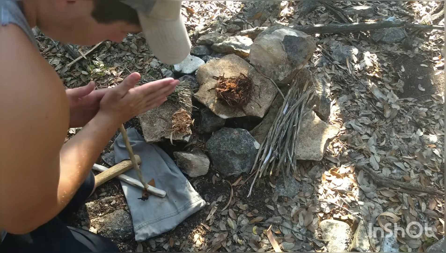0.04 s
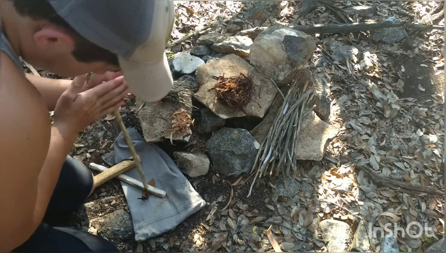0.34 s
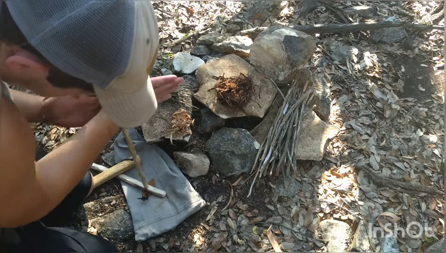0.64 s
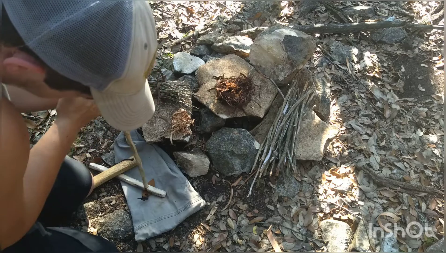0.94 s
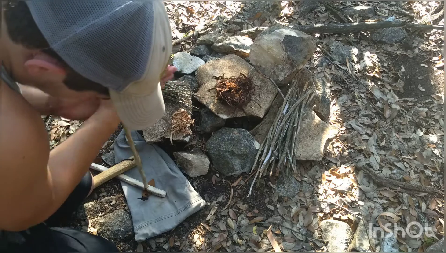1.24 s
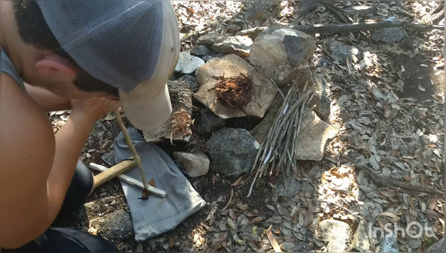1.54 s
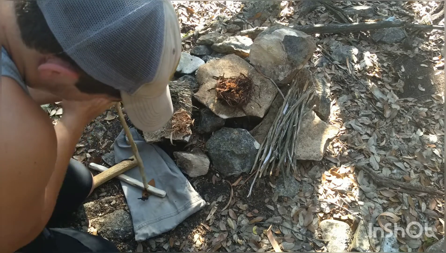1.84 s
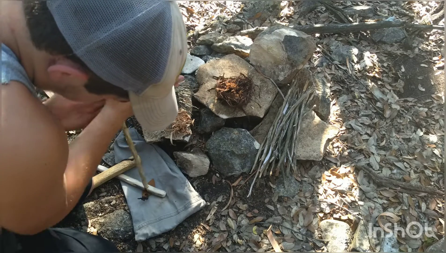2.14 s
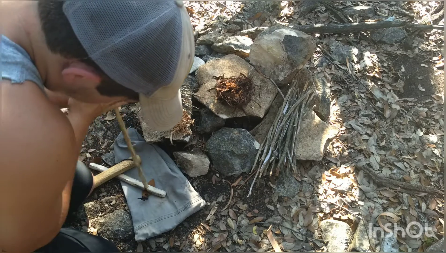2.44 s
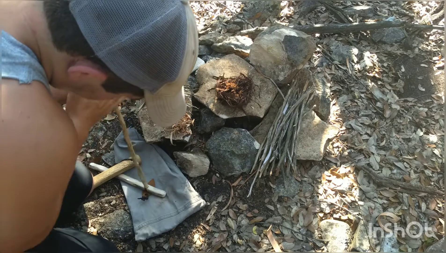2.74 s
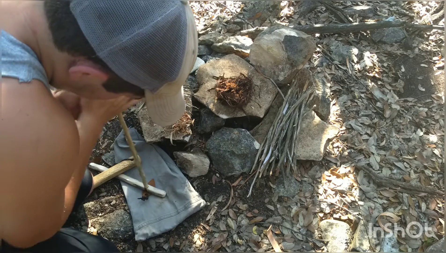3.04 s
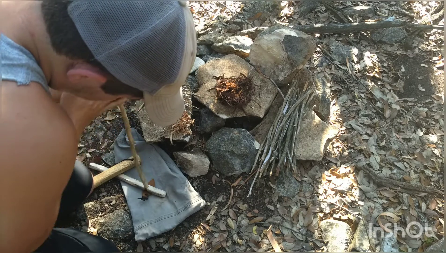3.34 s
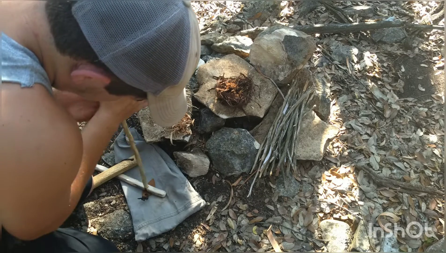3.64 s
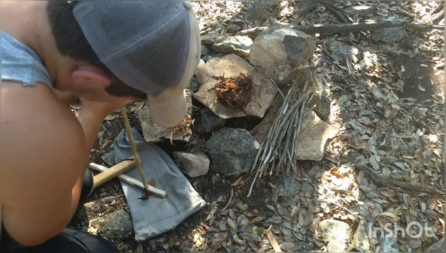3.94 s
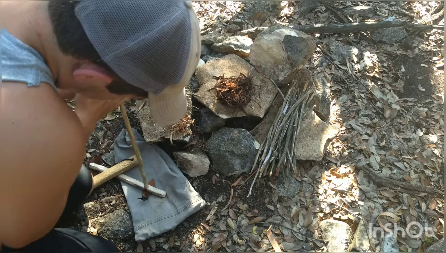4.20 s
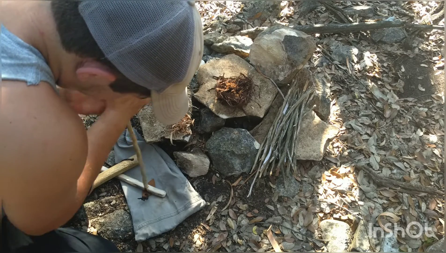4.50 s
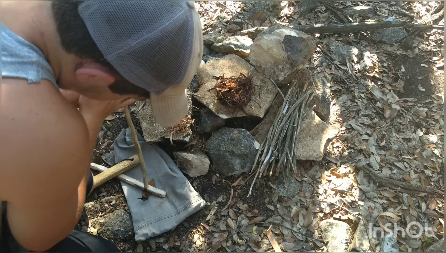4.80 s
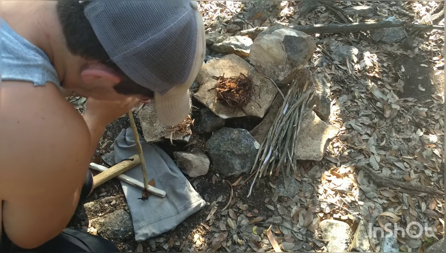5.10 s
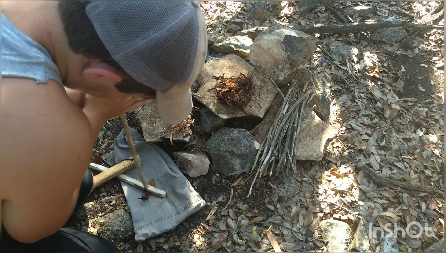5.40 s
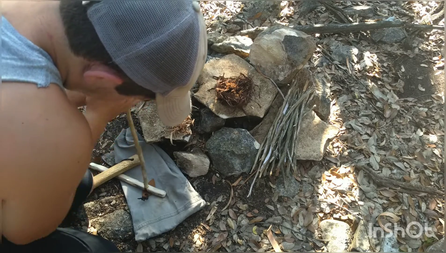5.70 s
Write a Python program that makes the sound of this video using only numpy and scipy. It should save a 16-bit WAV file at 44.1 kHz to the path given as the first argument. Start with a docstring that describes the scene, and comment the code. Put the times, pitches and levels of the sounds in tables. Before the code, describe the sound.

Close to a stereo microphone in woodland, a wooden spindle is spun between palms, its tip grinding in a wooden board at about four strokes a second. The dry scraping grows stronger and brighter, with tiny squeaks as the tip catches. Near the end it pauses briefly, then resumes more softly. Faint high insects, a low rumble of air and two distant humming motors continue throughout.

```python
"""A hand drill in woodland, close to a stereo pair of microphones. From the start two palms spin a
wooden spindle back and forth, about four strokes a second, its tip grinding in a hearth board's socket.
After a second the scraping grows stronger and the tip begins to catch and squeak. Near 5 s comes a
short pause while the hands go back up, then softer strokes. All the while insects sing in the trees
and two motors hum far away."""
import sys
import numpy as np
from scipy import signal
from scipy.fft import rfft, irfft
from scipy.io import wavfile

SR = 44100
rng = np.random.default_rng(int(sys.argv[2]) if len(sys.argv) > 2 else 0)


def store_pcm(level_fs):
    """Save levels as 16-bit WAV."""
    pcm = np.round(np.clip(level_fs, -1, 1) * 32767).astype(np.int16)
    wavfile.write(sys.argv[1], SR, np.atleast_2d(pcm).T)


N = 254016
TIME = np.arange(N) / SR
FREQS = np.fft.rfftfreq(N, 1 / SR)


# Colours of the two kinds of friction: frequency_hz, relative_db
GRIND_SPECTRUM = [(100, -38), (420, -18.5), (680, -12.5), (1400, -6.5), (1700, -6), (2000, -3),
                  (2600, -4.5), (3300, -3), (3900, -7.5), (4500, -10), (5800, -13), (8000, -15.5),
                  (12000, -22.5), (15500, -24)]
SCRAPE_SPECTRUM = [(200, -33.5), (1100, -16), (2800, -34.5), (3500, -14), (3900, -3), (4400, 0),
                   (5000, 0.5), (7000, -2), (7800, -7.5), (9200, -10.5), (11000, -10), (11900, -14.5),
                   (13500, -16.5), (15300, -9)]
def drill(grind_trim_db=3.44, scrape_trim_db=-0.95):
    """Close to the microphones, each stroke grinds coarsely and, under pressure, scrapes brightly."""
    grind_db, scrape_db = strokes()
    grind = friction(grind_db + grind_trim_db, GRIND_SPECTRUM, slips_per_s=8000,
                     chatter_hz=267, chatter_db=0.5, uneven_db=1.1, drift=0.053)
    scrape = friction(scrape_db + scrape_trim_db, SCRAPE_SPECTRUM, slips_per_s=14000,
                      chatter_hz=347, chatter_db=1.8, uneven_db=1.5, drift=0.004)
    shared, right_only = grind + scrape + catches()
    return stereo_image(shared, right_only)


# Passes of the palms, levels before the drill's trims:
# start_s, length_s, grind_db, scrape_db, bite_wait_s, bite_length_s
PALM_PASSES = [(-0.117, 0.25, -42.5, -43.5, 0.066, 0.19), (0.169, 0.25, -39.5, -36, 0.03, 0.26),
               (0.435, 0.28, -40, -37, 0.014, 0.16), (0.722, 0.26, -41, -37.5, 0.022, 0.17),
               (0.985, 0.27, -41.5, -33, 0.0094, 0.15), (1.247, 0.22, -40, -35, 0.045, 0.15),
               (1.502, 0.24, -40.0, -32, 0.014, 0.13), (1.731, 0.21, -41, -33.6, 0.05, 0.087),
               (1.953, 0.25, -42.5, -32, 0.04, 0.11), (2.187, 0.19, -38.5, -31.5, 0.057, 0.083),
               (2.419, 0.24, -41.5, -31, 0.015, 0.11), (2.665, 0.18, -39.5, -32.5, 0.07, 0.15),
               (2.991, 0.19, -41.5, -32.5, 0.059, 0.043), (3.184, 0.23, -43, -38.3, 0.052, 0.12),
               (3.441, 0.25, -42.5, -34.5, 0.019, 0.11), (3.689, 0.17, -41, -32.5, 0.067, 0.119),
               (3.928, 0.18, -41.5, -30, 0.009, 0.078), (4.109, 0.17, -41, -30.5, 0.076, 0.051),
               (4.343, 0.19, -43, -30, 0.0063, 0.069), (4.534, 0.17, -41.5, -33, 0.064, 0.12),
               (4.804, 0.16, -43, -65, 0.0, 0.055), (5.163, 0.087, -59, -54, 0.0, 0.02),
               (5.391, 0.22, -47, -45.5, 0.0, 0.29), (5.634, 0.19, -44, -44, 0.075, 0.1)]
def strokes(bite_s=0.012, let_go_s=0.022, loose_share=0.24):
    """Each pass speeds the spindle up and stops it; the tip bites. Gives grinding and scraping in dB."""
    grind = np.full(N, gain_of(-72))  # faint rubbing while the hands turn round or rest
    scrape = np.full(N, gain_of(-69))
    for start_s, length_s, grind_db, scrape_db, wait_s, hold_s in PALM_PASSES:
        age = TIME - start_s
        speed = abs(np.sin(np.pi * np.clip(age / length_s, 0, 1)))
        bite = np.clip((age - wait_s) / bite_s, 0, 1)
        release = np.exp(-np.maximum(age - wait_s - hold_s, 0) / let_go_s)
        pressure = loose_share + (1 - loose_share) * bite * release
        grind += gain_of(grind_db) * speed
        scrape += gain_of(scrape_db) * speed ** 0.91 * pressure
    return 20 * np.log10(grind), 20 * np.log10(scrape)


# Resonances of spindle and board: pitch_hz, width_hz, gain_db
WOOD_MODES = [(645, 80, -6), (1340, 180, -7), (2600, 220, -5), (3920, 200, -4), (4980, 220, -4),
              (5650, 160, -10), (6170, 180, -6), (6900, 200, -4)]
def friction(level_db, spectrum, slips_per_s, chatter_hz, chatter_db, uneven_db, drift, spread_db=2):
    """Tiny slips of wood on wood ring the spindle and board; gives two uncorrelated signals."""
    speed = gain_of((level_db - level_db.max()) / 2)
    slipping = rng.random((2, N)) < slips_per_s / SR
    sizes = gain_of(spread_db * np.minimum(rng.exponential(1, (2, N)), 4))
    slips = slipping * sizes * rng.choice([-1, 1], (2, N))
    # high spots on the tip pass faster as the spindle speeds up
    chatter = np.sin(phase_of(chatter_hz * speed * (1 + 0.24 * wander(40))))
    slips *= gain_of(chatter_db * chatter + uneven_db * wander(57))
    detune = 1 + drift * wander(2.8)  # the palms shift their grip
    ringing = sum(gain_of(db) * resonate(slips, hz * detune, width) for hz, width, db in WOOD_MODES)
    rubbed = shifting_contact(weak_modes(slips + ringing))
    return gain_of(level_db) * unit_rms(colour(rubbed, spectrum))


def weak_modes(slips, share=0.61, decay_s=0.0062, grip_count=4):
    """The wood's many weak modes sustain each slip; which ones sound depends on where the palms grip."""
    age = np.arange(1500) / SR
    tails = rng.standard_normal((grip_count, len(age))) * np.exp(-age / decay_s)
    grips = np.array([wander(2.9) for _ in tails])
    grips /= np.linalg.norm(grips, axis=0)
    rung = [signal.oaconvolve(slips, tail[None] / np.linalg.norm(tail), axes=1) for tail in tails]
    return slips + share * sum(grip * ring[:, :N] for grip, ring in zip(grips, rung))


def shifting_contact(x, depth_db=2.5, span_hz=151, span_s=0.017, frame=256):
    """The contact keeps changing, so narrow bands swell and fade at random."""
    bands = signal.stft(x, nperseg=frame)[2]
    swell = rng.standard_normal(bands.shape[1:])
    for axis, steps in enumerate((span_hz * frame / SR, span_s * SR / (frame / 2))):
        kernel = np.exp(-(np.arange(-20, 21) / steps) ** 2)
        swell = signal.fftconvolve(swell, np.expand_dims(kernel, 1 - axis), "same")
    return signal.istft(bands * gain_of(depth_db * unit_rms(swell)), nperseg=frame)[1][:, :N]


# Squeaks in the socket: start_s, level_db, pitch_hz, length_s
TIP_SQUEAKS = [(1.303, -43, 5600, 0.013), (1.405, -41, 5640, 0.035), (1.528, -36, 5800, 0.0051),
               (2.266, -34.5, 6050, 0.0093), (2.351, -48.5, 3400, 0.051), (2.535, -33.5, 6250, 0.021),
               (2.773, -23.5, 2026, 0.0098), (2.782, -36, 6800, 0.012), (2.98, -43.5, 2600, 0.033),
               (3.049, -21.5, 6140, 0.0063), (3.271, -34, 5830, 0.0081), (3.769, -32, 3840, 0.027),
               (3.945, -32, 6300, 0.0044), (4.213, -36, 5580, .007), (4.355, -38.5, 6150, 0.0056),
               (4.604, -41, 5060, 0.0046), (5.532, -39.5, 3680, 0.022)]
def catches(roughness=0.29, width_hz=500):
    """The tip sticks, lets go and gives a brief, rasping squeak."""
    squeaks = np.zeros((2, N))
    for start_s, level_db, pitch_hz, length_s in TIP_SQUEAKS:
        envelope = np.sin(np.pi * np.clip((TIME - start_s) / length_s, 0, 1))
        rasp = unit_rms(resonate(rng.standard_normal((2, N)), pitch_hz, width_hz))
        tone = np.sin(phase_of(pitch_hz * (1 + 0.0029 * wander(160))))
        squeaks += gain_of(level_db) * envelope * ((1 - roughness) * tone + roughness * rasp)
    return squeaks


# The recorder's stereo image: frequency_hz, right_lag_cycles, coherence (0-1), left_minus_right_db
STEREO_IMAGE = [(60, 0, 0.4, 0), (250, 0, 0.1, 0), (480, 0, 0.75, 1), (620, -0.03, 0.77, 5),
                (850, 0.0, 0.99, 0), (1250, 0.0, 0.98, 0), (1600, 0.19, 0.7, -5), (2150, 0.5, 1, 0),
                (2300, 0.5, 1, 0), (2550, 0.5, 1, 0), (2850, 0.52, 0.85, 0), (3150, 0.76, 0.68, 0),
                (3500, 0.99, 0.91, 1), (3900, 1.16, 0.49, 3), (4300, 1.5, 0.97, 0), (4650, 1.5, 0.97, 0),
                (5250, 1.72, 0.56, -1), (5850, 1.99, 0.9, 0), (6350, 2.13, 0.66, 0), (6850, 2.52, 0.91, -1),
                (7700, 2.95, 0.4, -3), (8500, 3.03, 0.67, 0), (9400, 2.59, 0.4, -2), (10600, 3.03, 0.8, 0),
                (11900, 2.5, 0.92, 0), (13000, 3.0, 0.73, 0), (14300, 2.6, 0.41, -3),
                (15300, 3.05, 0.68, -2)]
def stereo_image(shared, right_only):
    """Band by band the recorder's right channel is phase-shifted and partly unlike the left: wide, phasey."""
    lag, coherence, balance_db = over_frequency(STEREO_IMAGE)
    left = rfft(shared)
    shifted = np.exp(-2j * np.pi * lag) * left
    right = coherence * shifted + np.sqrt(1 - coherence ** 2) * rfft(right_only)
    return irfft(np.array([left * gain_of(balance_db / 2), right * gain_of(-balance_db / 2)]), N)


# Shrill insect tones, levels before panning: pitch_hz, level_db
INSECT_TONES = [(6830, -83), (7607, -73), (7750, -71), (8204, -66), (8400, -76), (8597, -69.5), (8760, -75),
                (9335, -79.5), (9870, -81)]
def insects(jitter_hz=26, buzz_hz=15200, width_hz=1800, wing_hz=29.75, throb_db=6, uneven_db=1.5):
    """Up in the trees: shimmering tones, and one very high song that throbs with each wing stroke."""
    shrill = sum(far_tone(phase_of(hz + jitter_hz * wander(91)), db) for hz, db in INSECT_TONES)
    buzz = rng.standard_normal((2, N))
    for _ in range(2):
        buzz = resonate(buzz, buzz_hz, width_hz)
    wings = np.sin(phase_of(wing_hz * (1 + 0.026 * wander(6))))
    throb = gain_of(throb_db * wings + uneven_db * wander(110))
    to_the_right = gain_of([[-2], [1.5]])
    return shrill + gain_of(-59) * unit_rms(buzz * throb) * to_the_right


# The motor's hum at twice its shaft speed, before trim and panning: time_s, level_db
MOTOR_HUM = [(0.0, -69), (0.72, -63), (0.82, -53.5), (1.64, -52), (1.94, -65), (2.1, -56), (2.49, -55.5),
             (2.6, -64), (5.61, -59.5), (5.76, -63)]
# Its overtones, before panning: shaft_multiple, level_db
MOTOR_OVERTONES = [(3, -68.5), (4, -103), (5, -83)]
def steady_motor(shaft_hz=52.1, trim_db=1.5):
    """Far off, a motor holds its speed while its hum swells and fades."""
    hum_db, = over_time(MOTOR_HUM)
    shaft = phase_of(shaft_hz * (1 + 0.0071 * wander(2.9)))
    hum = far_tone(2 * shaft, hum_db + trim_db)
    return hum + sum(far_tone(multiple * shaft, db) for multiple, db in MOTOR_OVERTONES)


# The engine's drone, before trims and panning: time_s, fundamental_db, octave_db
ENGINE_DRONE = [(0.0, -59, -88), (1.59, -65, -73), (1.78, -72, -56), (2.3, -59, -55), (2.7, -65, -65),
                (3.75, -55.5, -58.5), (4.2, -50.5, -76), (4.5, -47.5, -65), (5.05, -53.5, -50.5),
                (5.32, -59.5, -65), (5.76, -54.5, -52)]
def slowing_engine(start_hz=88.6, sag_hz_per_s=2.2, idle_hz=77):
    """Also far off, an engine runs down at an even pace to its idle."""
    firing_hz = np.maximum(start_hz - sag_hz_per_s * TIME, idle_hz)
    firing = phase_of(firing_hz * (1 + 0.0075 * wander(6.3)))
    fundamental_db, octave_db = over_time(ENGINE_DRONE)
    harmonics_db = (fundamental_db - 3.5, octave_db - 4.5, octave_db - 16)
    return sum(far_tone(multiple * firing, db) for multiple, db in enumerate(harmonics_db, 1))


def far_tone(phase, level_db, waver_db=2, right_shift_rad=1):
    """One distant, wavering tone, a little stronger on the right."""
    left = gain_of(-1 + waver_db * wander(2.3)) * np.sin(phase)
    right = gain_of(2.5 + waver_db * wander(10.6)) * np.sin(phase + right_shift_rad)
    return np.sqrt(2) * gain_of(level_db) * np.array([left, right])


# Colour of the woodland air: frequency_hz, relative_db
AIR_SPECTRUM = [(20, -11), (40, -10), (62, 1), (125, 0.5), (190, -4), (270, -12), (800, -12.5), (1400, -18),
                (2300, -17), (4300, -19), (7300, -14), (9000, -17), (11800, -25), (15500, -18.5)]
def woodland_air(level_db=-52):
    """All round the microphones, low rumble and the faint hiss of the woods."""
    shared, right_only = colour(rng.standard_normal((2, N)), AIR_SPECTRUM)
    return gain_of(level_db) * unit_rms(stereo_image(shared, right_only))


def gain_of(db):
    """Decibels to amplitude."""
    return 10 ** (np.asarray(db) / 20)


def unit_rms(x):
    """Scales to rms 1."""
    return x / np.sqrt(np.mean(x ** 2) + 1e-20)


def over_time(rows):
    """The columns of a curve table at every sample."""
    time_s, *columns = np.transpose(rows)
    return [np.interp(TIME, time_s, column) for column in columns]


def over_frequency(rows):
    """The columns of a spectrum table at every frequency bin."""
    hz, *columns = np.transpose(rows)
    return [np.interp(np.log(FREQS + 1), np.log(hz + 1), column) for column in columns]


def colour(x, spectrum):
    """Filters x by a spectrum in dB."""
    return irfft(rfft(x) * gain_of(over_frequency(spectrum)[0]), N)


def wander(rate_hz):
    """A smooth random curve of rms 1, changing about rate_hz times a second."""
    return unit_rms(irfft(rfft(rng.standard_normal(N)) * np.exp(-(FREQS / rate_hz) ** 2), N))


def phase_of(hz):
    """Running phase of a frequency curve, from a random start."""
    return 2 * np.pi * (np.cumsum(hz * np.ones(N)) / SR + rng.random())


def resonate(x, hz, width_hz):
    """A resonance of gain 1 that follows the curve hz."""
    carrier = np.exp(1j * phase_of(hz))
    pole = np.exp(-np.pi * width_hz / SR)
    return 2 * (carrier * signal.lfilter([1 - pole], [1, -pole], x / carrier)).real


def scene():
    """The drill close by, the woods behind it, the motors in the distance."""
    return drill() + woodland_air() + insects() + steady_motor() + slowing_engine()


def record(dry, cutoff_hz=15850):
    """The recorder's band limit: a steep low-pass on both channels."""
    lowpass = signal.firwin(511, cutoff_hz, window=("kaiser", 9), fs=SR)
    return signal.oaconvolve(dry, lowpass[None], "same")


dry = scene()
out = record(dry)
store_pcm(out)
```